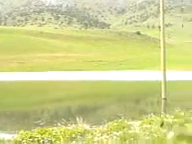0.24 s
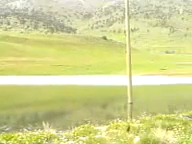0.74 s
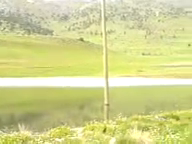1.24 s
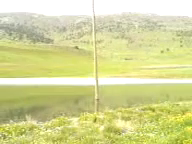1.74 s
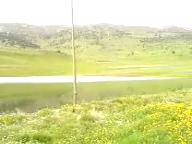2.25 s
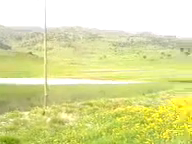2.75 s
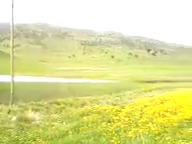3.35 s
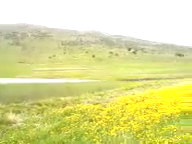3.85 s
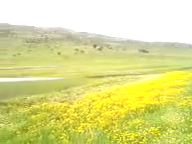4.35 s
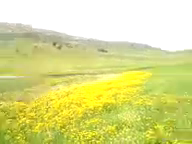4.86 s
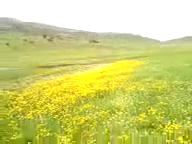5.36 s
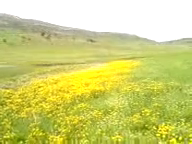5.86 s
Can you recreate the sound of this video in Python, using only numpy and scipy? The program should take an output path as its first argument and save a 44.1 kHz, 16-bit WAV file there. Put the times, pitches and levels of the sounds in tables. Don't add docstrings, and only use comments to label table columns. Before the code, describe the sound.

Outdoors at an open pond, a near frog gives three loud calls of six rapid, grating notes, then a fourth cut off after four. A far frog answers dully between them. Low wind bumps hit the microphone mostly in the first two and a half seconds, with sparse thin bird chirps and a faint distant chorus hiss. The sound is narrow, phone-like and slightly overloaded on the loudest pulses.

```python
import sys
import numpy as np
from scipy import signal
from scipy.fft import rfft, irfft, next_fast_len
from scipy.io import wavfile
from scipy.ndimage import uniform_filter1d, map_coordinates

SR = 44100
rng = np.random.default_rng(int(sys.argv[2]) if len(sys.argv) > 2 else 0)


def transcribe(signal):
    frames = np.atleast_2d(signal).T
    limited = np.clip(frames, -1, 1)
    pcm = np.round(limited * 32767).astype(np.int16)
    wavfile.write(sys.argv[1], SR, pcm)


def volts(x):
    e = np.asarray(x, float) / 20
    return 10 ** e


N = 267687


def along(points, hz):
    f, value = np.transpose(points)
    return np.interp(np.log(hz + 1), np.log(f + 1), value)


def modes(table, f):
    total = 0
    for k, (center, width, db) in enumerate(table):
        peak = volts(db) * SR / np.pi * center / 2
        total = total + (-1) ** k * peak / (center * center - f * f + 1j * f * width)
    return total


def add(track, s, sound):
    track[round((s + 1) * SR):][:len(sound)] += sound


def wobble(rate):
    knots = rng.standard_normal(int(N * rate / SR) + 4)
    return map_coordinates(knots, [np.arange(N) * rate / SR])


def filtered(x, response):
    m = next_fast_len(N + SR // 2)
    return irfft(rfft(x, m) * response(np.fft.rfftfreq(m, 1 / SR)), m)[..., :N]


def rush(spectrum, patchy_db):
    z = signal.stft(rng.standard_normal(N), nperseg=512)[2]
    patches = uniform_filter1d(rng.standard_normal(z.shape), 4, 0)
    patches = uniform_filter1d(patches, 8, 1)
    x = signal.istft(z * volts(patchy_db * patches / patches.std()), nperseg=512)[1][:N]
    x = filtered(x, lambda hz: volts(along(spectrum, hz)))
    return x / x.std()


# (time [s], far chorus level [dB], breeze level [dB])
AIR_LEVELS = [(0, -54, -58), (1, -52, -58), (2.1, -53, -58), (2.7, -56, -60), (3.2, -57, -60),
              (3.6, -56, -57), (3.95, -56, -55), (4.6, -57, -60), (4.9, -56, -60), (5.2, -53.5, -59),
              (5.5, -55, -60), (6.07, -56, -61)]
# (frequency [Hz], level [dB per Hz])
CHORUS_COLOR = [(410, -25), (700, 3), (1140, 6), (1860, 9), (2660, 9), (3000, 5.5), (3400, -0.5),
                (3800, -7), (4500, -5), (5000, -120)]
# (frequency [Hz], level [dB per Hz])
BREEZE_COLOR = [(15, -61), (25, -19), (65, -2.5), (204, -5.5), (298, -1), (660, -2.5), (965, -7),
                (1300, -12.5), (1690, -28.5), (2860, -120)]


def meadow():
    s, chorus_db, breeze_db = np.transpose(AIR_LEVELS)
    t = np.arange(N) / SR
    chorus_gain = volts(np.interp(t, s, chorus_db) - 1.3 + .8 * wobble(10))
    breeze_gain = volts(np.interp(t, s, breeze_db) + 4.5 + 2.5 * wobble(30))
    chorus = chorus_gain * rush(CHORUS_COLOR, patchy_db=3.1)
    return chorus + breeze_gain * rush(BREEZE_COLOR, patchy_db=-3.0)


# (time [s], peak level [dB], frequency [Hz])
WIND_BUMPS = [(0.05, -25.5, 136), (0.05, -19, 290), (0.157, -11, 290), (0.365, -25, 284), (0.439, -29, 333),
              (0.515, -26, 245), (0.57, -26.5, 328), (0.835, -26.5, 256), (0.952, -17.5, 254),
              (1.005, -31, 146), (1.348, -25.5, 202), (1.386, -13, 318), (1.438, -11, 278),
              (1.63, -26.5, 210), (1.759, -20, 213), (1.869, -25, 269), (1.5, -20.5, 262),
              (1.796, -27.5, 240), (1.964, -15.5, 272), (1.988, -21.5, 300), (2.004, -17.5, 280),
              (2.012, -16, 300), (2.089, -29.5, 264), (2.288, -25.5, 166.5), (2.444, -24, 362),
              (2.508, -27, 237), (3.302, -31, 268), (3.367, -37, 196)]
# (peak time [s], peak level [dB], rise [s], fall [s])
WIND_GUSTS = [(.056, -29.5, 0.086, 0.18), (.168, -22, 0.018, 0.046), (.35, -34.5, 0.032, .05),
              (.956, -45, 0.085, 0.12), (1.394, -30, 0.059, 0.065), (1.44, -24, 0.025, 0.13),
              (1.644, -67, 0.15, .03), (1.77, -33.5, 0.035, 0.062), (1.874, -39, 0.033, 0.16),
              (2.02, -27.5, 0.13, 0.022), (2.092, -38.5, 0.031, 0.059), (3.128, -52.5, 0.075, 0.12),
              (3.318, -47, 0.19, 0.036)]
# (frequency [Hz], level [dB per Hz])
FLUTTER_COLOR = [(24, -60.5), (40, -27.5), (140, -2), (301, -2.5), (412, -13.5), (563, -26.5), (800, -49.5),
                 (1040, -63.5), (1760, -120)]


def wind():
    track = np.zeros(N + 2 * SR)
    t = np.arange(-600, 900) / SR
    for (s, db, hz), turn in zip(WIND_BUMPS, rng.random(len(WIND_BUMPS))):
        push = np.exp(-(t * hz / 0.8) ** 2)
        bump = push * np.cos(2 * np.pi * (hz * t + turn))
        add(track, s + t[0] + 0.007, volts(db - 5.5) * bump)
    now = np.arange(N) / SR
    force = 0
    for s, db, rise, fall in WIND_GUSTS:
        away = np.maximum((s - now) / rise, (now - s) / fall)
        force = force + volts(db - 30 * away)
    lumps = volts(4.5 * wobble(70) - 2)
    return track[SR:][:N] + force * lumps * rush(FLUTTER_COLOR, patchy_db=-0.5)


# (time [s], level [dB])
FINGER_TICKS = [
    (1.1632, -28),
    (1.166, -34),
    (1.1675, -15),
    (1.1719, -29.5),
    (1.388, -37),
    (1.799, -45),
    (5.189, -50),
    (5.385, -37),
]
# (frequency [Hz], width [Hz], level [dB])
CASE_MODES = [(605, 1040, -1), (1480, 360, 0), (2950, 300, -3)]


def handling():
    blows = np.zeros(N)
    for s, db in FINGER_TICKS:
        blows[round(s * SR)] = volts(db)
    return filtered(blows, lambda f: modes(CASE_MODES, f))


# (time [s], length [s], start pitch [Hz], end pitch [Hz], level [dB])
BIRD_CHIRPS = [(0.213, 0.03, 2950, 2985, -47.5), (0.24, 0.039, 2970, 3340, -42.5),
               (1.19, 0.061, 1100, 1190, -45.5), (1.302, .05, 1270, 1425, -47),
               (1.556, 0.033, 3050, 3360, -54), (1.717, 0.045, 3260, 2880, -48.5),
               (1.794, 0.015, 2950, 2550, -44), (2.023, .025, 2740, 2280, -45.5),
               (3.043, 0.03, 3200, 3740, -51), (3.185, 0.04, 3480, 3280, -53.5),
               (3.309, 0.021, 2930, 3630, -50), (3.536, 0.029, 2420, 3460, -50.5),
               (3.806, 0.022, 3210, 3755, -49), (3.822, 0.04, 3300, 2800, -52.5),
               (4.579, 0.094, 3600, 2620, -51.5), (4.714, 0.017, 2900, 3880, -46.5),
               (5.008, 0.05, 3510, 2900, -51), (5.061, 0.06, 2740, 2410, -48.5),
               (5.511, 0.024, 3490, 3150, -56), (5.562, 0.059, 2700, 2300, -60),
               (5.309, 0.04, 2980, 3700, -52.5), (5.433, 0.026, 2710, 3670, -50)]


def birds():
    track = np.zeros(N + 2 * SR)
    for s, length, from_hz, to_hz, db in BIRD_CHIRPS:
        u = np.linspace(0, 1, round(length * SR))
        pitch = from_hz + (to_hz - from_hz) * u
        tone = np.sin(2 * np.pi * np.cumsum(pitch) / SR)
        add(track, s, volts(db) * np.sin(np.pi * u) ** .5 * tone)
    return track[SR:][:N] * (.58 + .42 * wobble(250))


# (sac width [Hz], sac drift [Hz per ms], swell [dB per ms],
# last pulse level [dB], whistle level [dB], body level [dB])
NOTE_SHAPES = [(144, 5, 5, 0.5, -34.5, -1.5), (124, -1, 0.76, -0.5, -27.5, 1.5),
               (145.5, 1, 0.94, -1.5, -26, 2.76), (123, -0.5, 1.07, -5, -21.5, -2.5),
               (80, 1.35, 1.28, -6.5, -21, 2), (85.5, 0.6, 0.73, -0.5, -21.5, 1)]
# (frequency [Hz], width [Hz], level [dB])
BODY_MODES = [(1100, 3400, -23), (2303, 1034, -1), (2800, 324, -14)]


def note(track, place, s, sac_hz, steady, last, slowing, db, full, jitter):
    width, drift, swell, last_db, whistle_db, body_db = NOTE_SHAPES[place]
    k = np.arange(32)
    chance = jitter * rng.standard_normal((32, 3))

    early = 1 / (1 + np.exp((full + 9 - k * steady) / 4))
    curve = .56 if place > 4.5 else 1
    stretch = (last - steady + .05) * slowing ** (k ** curve)
    gaps = steady - .05 + stretch - .015 * k - .4 * early
    back = np.cumsum(gaps) - gaps + (.018 + .12 * early) * chance[:, 0]

    rise = 3 * np.logaddexp(0, (back - full) / 3)
    swell_db = -swell * rise - 0.0025 * rise ** 2
    scatter_db = (.7 + 2 * early) * chance[:, 1]
    sizes = volts(db + swell_db + last_db * 0.17 ** k + scatter_db)

    size, lead = 8192, .12
    f = np.fft.rfftfreq(size, 1 / SR)
    sac = (sac_hz - drift * back + 15 * chance[:, 2])[:, None]
    whistle = (3440 - 5.5 * place ** 2, 85, whistle_db + 0.0073 * back[:, None])
    body = [(hz, w, level + body_db) for hz, w, level in BODY_MODES]
    throat = modes([body[0], (sac, width, -1.5), *body[1:], whistle], f)
    delays = np.exp(-2j * np.pi * np.outer(lead - back / 1000, f))
    add(track, s - lead, irfft(sizes @ (throat * delays), size))


# (last pulse time [s], level [dB], sac pitch [Hz], full-
# strength time [ms])
FAR_NOTES = [(.063, -37, 1850, 26), (.162, -38, 1850, 28), (.252, -37, 1640, 34), (1.305, -42, 1880, 20),
             (1.41, -42, 1850, 22), (1.515, -40, 1850, 24), (1.62, -38, 1850, 26), (1.72, -39, 1800, 26),
             (1.79, -38, 1600, 28), (2.87, -43, 1850, 24), (2.965, -41, 1950, 22), (3.072, -40, 1930, 28),
             (3.178, -41, 1900, 30), (3.275, -43, 1600, 24), (3.345, -44, 1570, 26), (.648, -33, 850, 45),
             (.748, -31, 1080, 35)]


def far_frog():
    track = np.zeros(N + 2 * SR)
    for s, db, hz, full in FAR_NOTES:
        note(track, 0, s - .004, hz, 3.3, 5.5, .6, db + 4, full, jitter=1.5)
    return filtered(track[SR:][:N], lambda f: 1 / (1 + (f / 2500) ** 6))


# (last pulse time [s], level [dB], full-strength time [ms], sac pitch [Hz])
NEAR_CALLS = [
    [(.4099, -5.5, 59.6, 1978), (.4957, -4.5, 42, 1928), (.5991, -0.5, 34, 2007), (.7068, -1, 41, 1988),
     (.8082, -4, 45.7, 1838), (.9111, -9, 43.6, 1543)],
    [(2.1772, -5, 58, 1980), (2.2674, -3, 38, 1977), (2.3673, -1.5, 31.7, 1982), (2.4744, -2.5, 38.4, 1983),
     (2.5828, -4.5, 44.8, 1736), (2.6755, -10.5, 40, 1515)],
    [(4.0548, -4.5, 58.5, 1964), (4.1389, -5, 47, 1890), (4.2396, -0.5, 32.3, 1961),
     (4.3472, -1.5, 34.5, 1920), (4.4548, -4, 46.2, 1826), (4.548, -6.5, 43, 1580)],
    [(5.7792, -4.5, 59.2, 2013), (5.8679, -4, 44, 1922), (5.967, -1.5, 34.4, 1955),
     (6.0705, -1.5, 36.2, 1970)],
]
STEADY_GAPS = [3.05, 3.07, 2.95, 2.91, 2.91, 3.15]
LAST_GAPS = [6.1, 5.8, 5.5, 5.7, 6.4]
CLOSING_GAPS = [11.2, 13, 8.1, 10]


def near_frog():
    track = np.zeros(N + 2 * SR)
    for call, closing in zip(NEAR_CALLS, CLOSING_GAPS):
        for place, ((s, db, full, sac_hz), last) in enumerate(zip(call, [*LAST_GAPS, closing])):
            slowing = .55 - .028 * max(last - 6.4, 0)
            note(track, place, s - .0007, sac_hz, STEADY_GAPS[place], last, slowing, db, full, jitter=0.87)
    return track[SR:][:N]


# (time [s], level [dB])
ECHO_LEVELS = [
    (0, -9.5),
    (0.029, -37),
    (0.088, -74),
    (.15, -58),
    (.24, -42),
    (.33, -49),
    (0.452, -59),
]


def echo(x):
    s, db = np.transpose(ECHO_LEVELS)
    t = np.arange(SR // 2) / SR
    strength = volts(np.interp(t, s, db, right=-120) - 28.5)
    tail = rng.standard_normal(len(t)) * strength
    return filtered(signal.fftconvolve(x, tail)[:N], lambda f: 1 / (1 + (f / 3800) ** 4))


def scene():
    background = meadow() + wind() + handling()
    calls = birds() + far_frog()
    far = calls + volts(12) * echo(calls)
    frog = near_frog()
    return (background + far + frog + echo(frog))[None]


def low_pass(x):
    return signal.sosfilt(signal.butter(12, 15900, fs=SR, output="sos"), x)


# (frequency [Hz], level [dB])
PHONE_TONE = [(30, -11.5), (300, -3), (1000, -4), (3500, 6), (3900, -5), (4350, -13), (4650, -34.5),
              (4900, -120)]


def record(dry):
    x = dry / (1 + np.abs(dry / .8) ** 4) ** (1 / 4)
    x = x + 0.032 * filtered(x ** 2, lambda f: f > 20)
    shake = filtered(rng.standard_normal(dry.shape), lambda f: 1 / (1 + (f / 900) ** 4))
    rough = x * (1 + .09 * shake / shake.std())
    x = filtered(rough, lambda f: volts(along(PHONE_TONE, f)))
    return low_pass(np.clip(x, -.72, .72))


dry = scene()
out = record(dry)
transcribe(out)
```